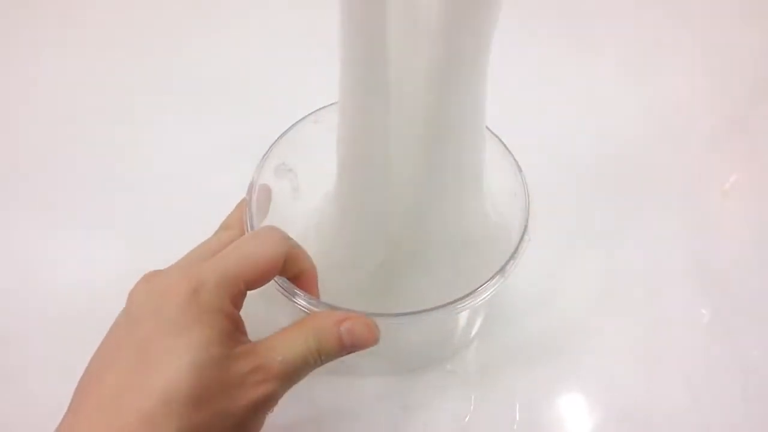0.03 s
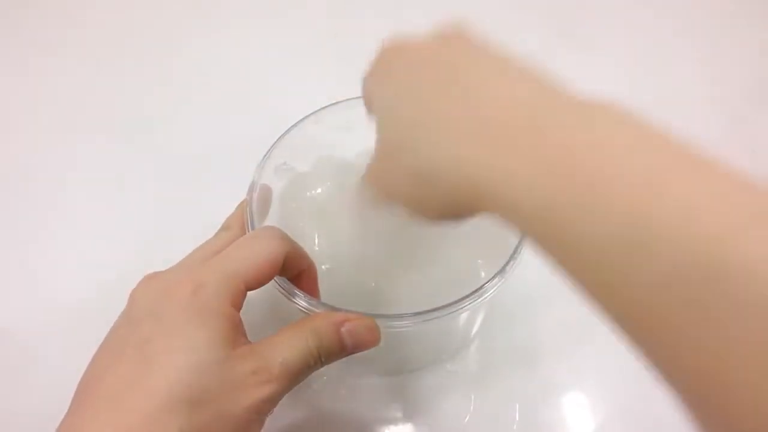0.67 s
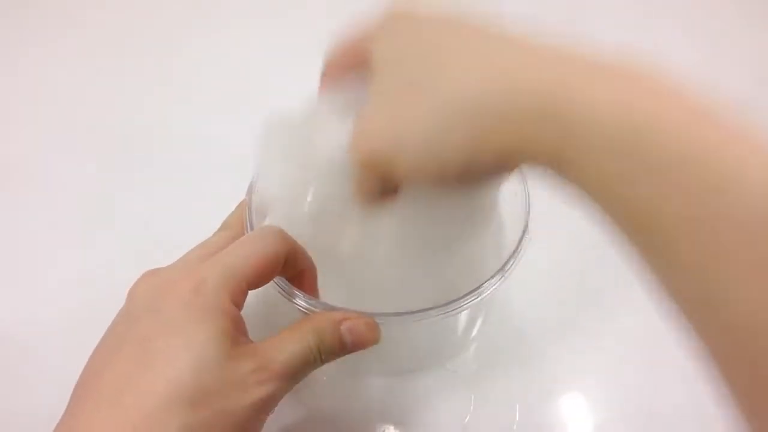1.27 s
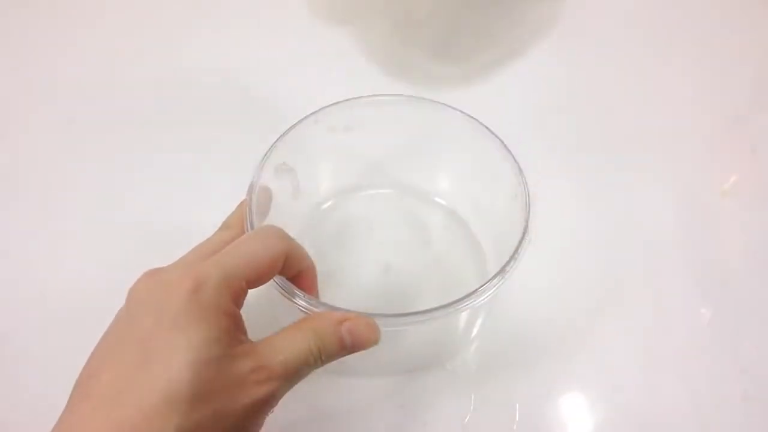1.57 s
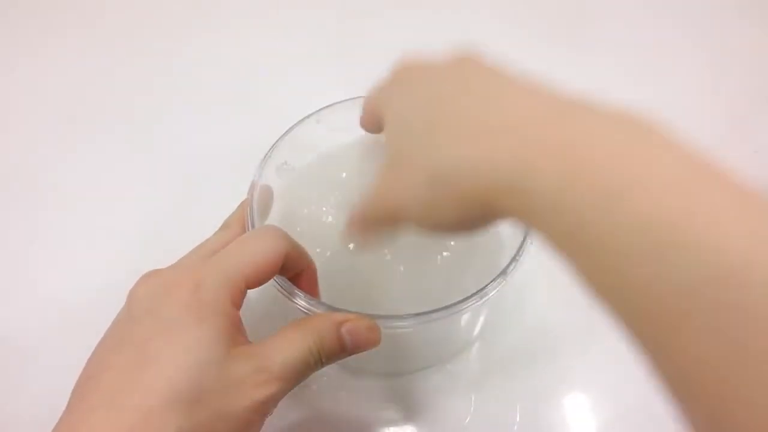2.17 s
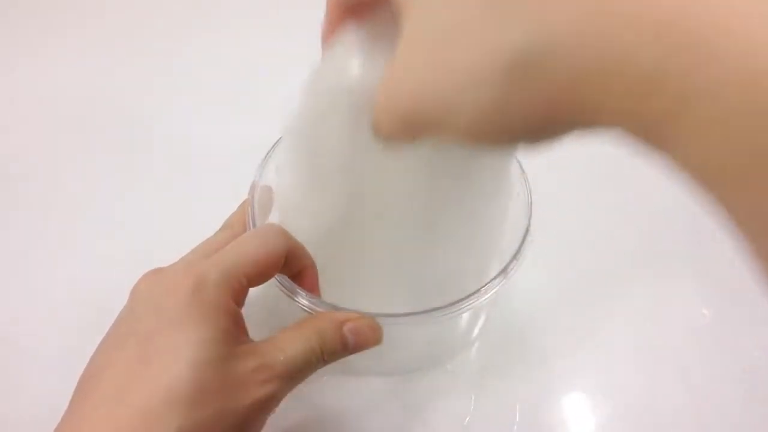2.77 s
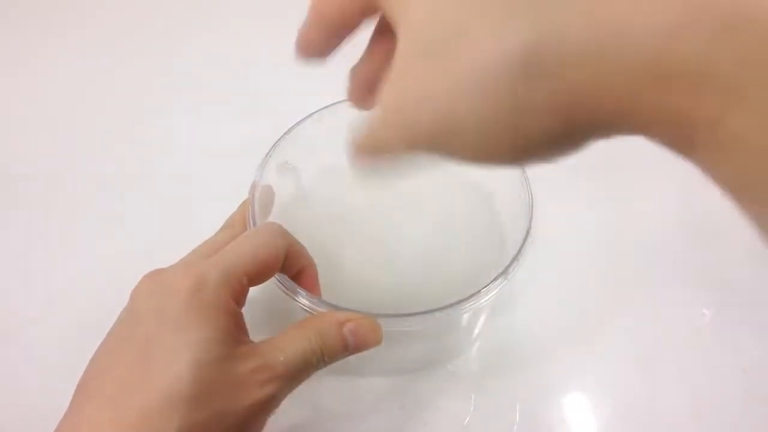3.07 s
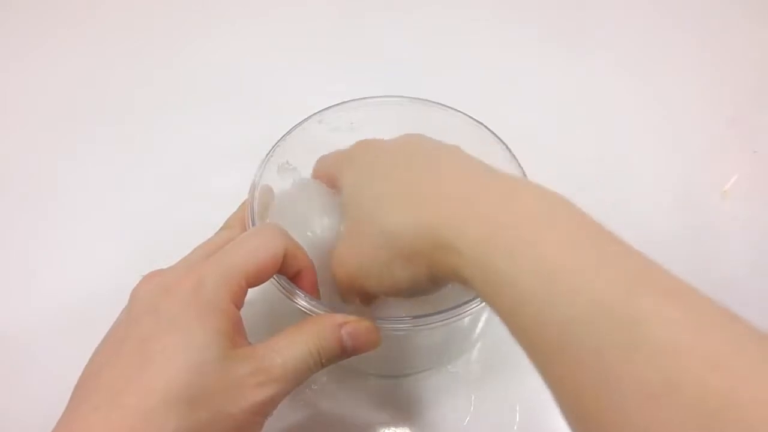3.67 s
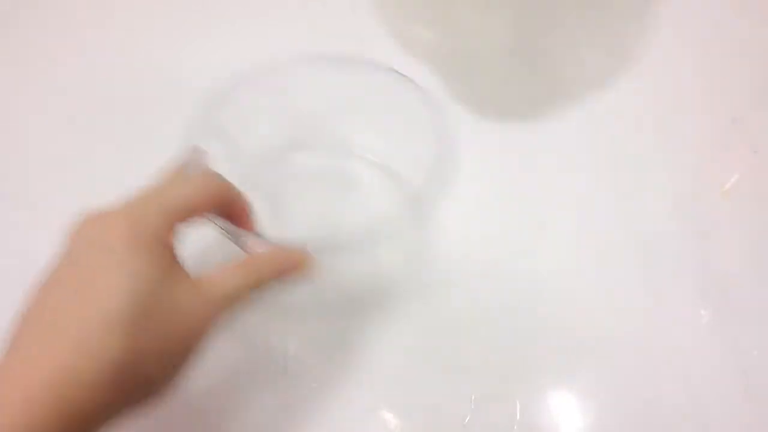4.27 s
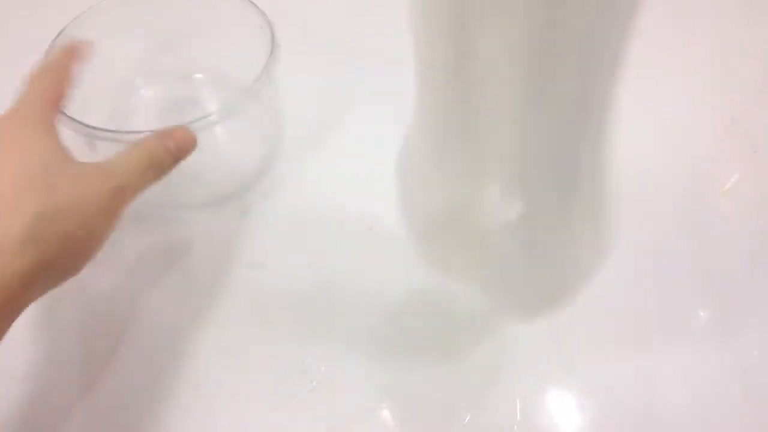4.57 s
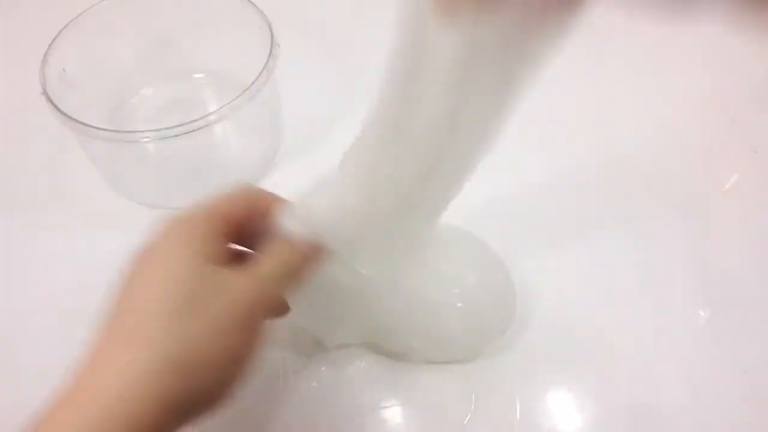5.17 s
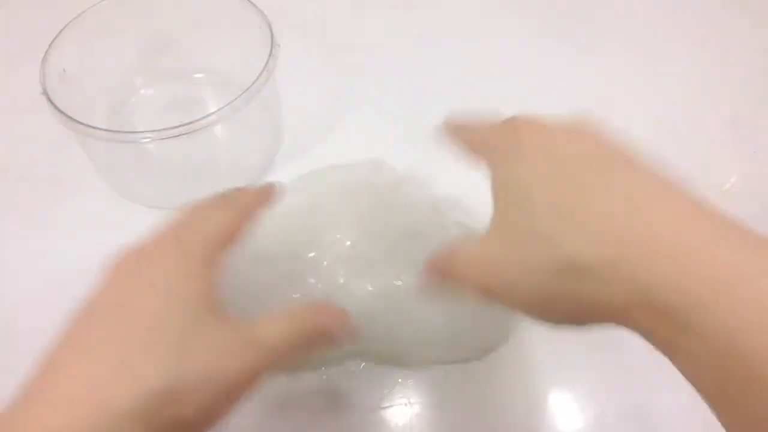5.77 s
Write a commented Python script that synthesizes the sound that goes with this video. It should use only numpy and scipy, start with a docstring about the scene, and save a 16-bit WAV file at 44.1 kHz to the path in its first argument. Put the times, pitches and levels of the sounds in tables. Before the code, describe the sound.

A hand kneads sticky slime in a plastic cup, close to the microphone. Air pockets pop and snap, fine threads crackle and folds squelch, while pushes knock the cup and thump the table softly. Near the end the empty cup scrapes across the tabletop, followed by quieter rubbing and a few small pops. A small room hums behind it, with a faint, fast chirp like a turning fan.

```python
"""Kneading slime in a plastic cup

A hand kneads sticky slime in a cup on a table, lifts it out, slides the cup away and presses the slime
on the tabletop. Trapped air pops, cracks and squelches, fine threads crackle as they tear, and the
stretching slime gives a thin squeak. The cup knocks and scrapes, and each push thumps the table.
Behind it a small room hums, with a faint, evenly repeating chirp like that of a turning fan."""
import sys
import numpy as np
from scipy import signal
from scipy.fft import rfft, irfft
from scipy.io import wavfile
from scipy.ndimage import uniform_filter1d

SR = 44100
rng = np.random.default_rng(int(sys.argv[2]) if len(sys.argv) > 2 else 0)


def generate_wav(signal):
    """Clip the signal to [-1, 1] and save it as 16-bit WAV at the path in sys.argv[1]."""
    frames = np.transpose(np.atleast_2d(signal))
    scaled = np.clip(frames, -1, 1) * 32767
    pcm = np.round(scaled).astype(np.int16)
    wavfile.write(sys.argv[1], SR, pcm)


N = 261513
TIME = np.arange(N) / SR

# Levels in the tables are relative; each layer sets its own trim.
# room tone: freq_hz, level_db
HISS_SPECTRUM = [(15, -46.5), (25, -11.5), (117, -8), (270, -8.5), (317, -11), (463, -6), (516, -13),
                 (624, -9.5), (714, -9), (887, -13.5), (2610, -27.5), (4140, -29), (8140, -33),
                 (11600, -33.5), (16000, -42)]
# the chirp fades and returns: time_s, level_db
CHIRP_FADER = [(1.85, -48), (2.05, -63), (2.6, -56), (2.9, -52.5), (3.25, -56.5), (4.0, -47)]
# the hand squeezes or stretches the slime: peak_s, rise_s, fall_s, threads_db, bubbles_db, drag_db
KNEADS = [(0.262, .1, .08, -56, -52, -65), (0.38, .08, .14, -58, -61, -62), (0.78, .1, .12, -58, -48, -43),
          (0.87, .03, .08, -48, -45, -49), (1.045, .11, .15, -37.5, -44, -42),
          (1.26, .05, .19, -54, -56, -48), (1.79, .14, .12, -54, -54, -63),
          (2.305, .11, .1, -47, -47.5, -47), (2.49, .08, .1, -55, -55, -56),
          (2.615, .11, .21, -50, -48.5, -47), (2.99, .08, .12, -53.5, -52, -64),
          (3.47, .07, .15, -55, -51, -49), (3.65, .08, .22, -44, -47.5, -41.5),
          (3.9, .12, .16, -58.5, -54, -57), (5.27, .06, .2, -58, -63, -61), (5.46, .07, .1, -52, -50, -50),
          (5.58, .06, .11, -59, -56, -64)]
# the slime slaps down or comes unstuck: peak_s, drag_db, spray_db
SLAPS = [(0.678, -28.5, -54), (1.872, -30, -39), (2.228, -45, -51), (3.108, -29.5, -45), (3.39, -44, -57),
         (4.59, -42, -62)]
# bright tearing threads: freq_hz, level_db
THREAD_SPECTRUM = [(1760, -28.5), (3000, -7), (3330, -2.5), (4470, -5.5), (4900, -7), (5290, -6.5),
                   (9330, -5), (14100, -7), (16000, -21)]
# small wet bubbles: freq_hz, level_db
BUBBLE_SPECTRUM = [(200, -7), (600, -7), (1400, 1.5), (2600, 0), (3600, -9.5), (5500, -20)]
# dull friction on the table: freq_hz, level_db
DRAG_SPECTRUM = [(40, -46), (75, -24), (130, -11), (210, -3), (350, 1), (600, -1.5), (850, -8),
                 (1500, -10.5), (3000, -41)]
# air pockets burst: start_s, snap_db, pocket_vs_snap_db, pocket_hz, snap_hz
POPS = [(0.2408, -31.5, -14, 720, 11700), (0.3432, -30, -14, 703, 8700), (0.6943, -24, 0, 1880, 2930),
        (0.799, -21, -34, 1870, 7450), (0.8815, -22, -32, 1200, 7770), (1.1093, -18, -20, 969, 2740),
        (1.1568, -25.5, -22, 710, 6700), (1.1957, -25, -18, 700, 10600), (1.259, -25, -12, 703, 10500),
        (1.8405, -23.5, -9, 786, 3550), (1.861, -10, -16, 2150, 2400), (1.8643, -14.5, -2.5, 905, 2460),
        (1.8797, -15, -13, 715, 5500), (1.9697, -31, -19, 1120, 11200), (2.3411, -27.5, -16, 1040, 2700),
        (2.4023, -31, -7, 1400, 9800), (2.4912, -33.5, -3, 990, 2590), (3.0563, -28, -2.5, 700, 2410),
        (3.0925, -24, -21, 1080, 2400), (3.0998, -14, -10.5, 950, 4200), (3.1066, -8, -12, 1060, 5500),
        (3.4478, -20.5, -12, 1860, 11400), (3.4784, -30.5, -3, 996, 2670), (3.5765, -29, -9, 1170, 2580),
        (3.6296, -22, -13, 1220, 3360), (3.8125, -27, -12.5, 816, 7710), (3.8931, -34, 3, 2520, 2850),
        (4.09, -33.5, -31, 783, 12000), (4.6991, -23, -10, 1310, 10100), (5.4321, -25, -24, 744, 7340),
        (5.5394, -26.5, -20, 754, 8000)]
# a slime film breaking: freq_hz, level_db
SNAP_SPECTRUM = [(400, -21), (1100, 2.5), (1800, 0.5), (2700, -4.5), (4000, -5), (5400, -6.5), (6500, -6),
                 (8000, -2.5), (10500, -1.5), (14500, -6), (17000, -20.5)]
# the hand knocks the cup, each spot favouring one band: start_s, level_db, centre_hz
KNOCKS = [(0.6662, -22.5, 2610), (0.6767, -19, 2780), (0.7279, -22, 2730), (2.2209, -25, 2280),
          (2.3164, -28, 1830), (3.3728, -26, 2970), (3.3899, -25.5, 2970), (4.3395, -18.5, 1830),
          (4.5806, -22.5, 1650)]
# the cup damped by slime and fingers: pitch_hz, width_hz, level_db
FULL_CUP_MODES = [(1100, 120, 7.5), (1410, 39, 6), (1860, 310, -2), (2820, 180, 0), (3700, 73, -7),
                  (4050, 85, -16), (5740, 370, -23.5), (6300, 150, -18)]
# cup or slime is pushed onto the table: start_s, level_db, rise_s
THUMPS = [(0.667, -23.5, 0.0016), (0.728, -25, .003), (0.763, -26, 0.021), (0.85, -27, 0.0015),
          (0.923, -30, 0.019), (1.036, -26, 0.0074), (1.112, -32, 0.0026), (1.867, -15.5, 0.0013),
          (2.221, -26.5, .002), (2.26, -26, 0.018), (2.569, -38, 0.011), (3.059, -32.5, 0.0033),
          (3.106, -22.5, 0.0032), (3.376, -29.5, 0.0016), (3.39, -20.5, 0.0068), (3.583, -22, 0.018),
          (3.702, -25.5, 0.028), (4.275, -31, 0.013), (4.374, -19, 0.0023), (4.453, -29.5, 0.0024),
          (4.583, -20, 0.0027), (4.699, -38.5, 0.0044)]
# the ring of the tabletop, strongest mode first: pitch_hz, level_db, t60_s
TABLE_MODES = [(127, -3.3, .145), (95, -14.5, 0.14), (186.5, -9, .13), (262, -13, 0.1), (310, -9, .08),
               (417, -18.5, 0.096), (590, -11, 0.08)]
# the ring of one large bursting bubble: pitch_hz, width_hz, level_db
CRACK_MODES = [(1220, 250, 4), (1750, 400, 0), (2700, 500, -6), (4150, 600, 0), (5350, 400, 2),
               (7700, 700, 0), (8600, 700, -7)]
# air squeezed through a fold: peak_s, rise_s, fall_s, level_db, pitch_hz
SQUELCHES = [(1.05, .1, .09, -30, 1010), (1.895, .02, .06, -39, 905), (2.31, .05, .06, -47, 1060),
             (2.48, .08, .09, -46, 1090), (2.615, .05, .1, -45, 950), (3.062, .008, .04, -39, 930),
             (3.109, .012, .028, -24, 1080), (3.15, .02, .06, -47, 1000), (3.64, .025, .13, -40, 1110),
             (3.725, .03, .08, -42, 1020), (3.875, .06, .05, -48, 770)]
# the stretching slime squeaks: time_s, level_db, slips_per_s
SQUEAK_CURVE = [(2.75, -75.5, 1400), (2.82, -68, 1270), (2.96, -68, 1392), (3.1, -72, 2300),
                (3.21, -60, 1400), (3.27, -69, 1500), (3.35, -80, 1240)]
# the empty cup, ringing more freely: pitch_hz, width_hz, level_db
EMPTY_CUP_MODES = [(1000, 300, -1), (1470, 120, -1), (1780, 90, 12), (2080, 50, 8), (2340, 130, 9),
                   (2620, 130, 7), (3370, 460, 0), (4350, 100, -7), (5170, 47, -12), (8300, 200, -19),
                   (9300, 52, -23), (10600, 54, -19), (11000, 85, -25)]
# plastic hissing over the table: freq_hz, level_db
SCRAPE_SPECTRUM = [(1200, -12), (2500, -1.5), (4000, 3.5), (6500, 1), (10000, -0.5), (14000, -3),
                   (17000, -14)]
# the sliding cup catches: peak_s, boost_db
JUDDERS = [(4.228, 4), (4.295, 3), (4.465, 5)]
# cup or hand rubs the tabletop: peak_s, rise_s, fall_s, level_db
RUBS = [(4.39, .03, .07, -47), (4.465, .04, .1, -39), (4.605, .025, .07, -37), (5.06, .07, .2, -50),
        (5.3, .16, .12, -48), (5.46, .06, .08, -51)]
# the room's reverb by band: freq_hz, t60_s, level_db
REVERB_BANDS = [(100, 0.75, -2), (300, 0.21, 3.5), (900, .24, -4.5), (2010, 0.19, -3), (5000, .24, 0),
                (13000, .22, 1.5)]


def amp(db):
    """Decibels to gain."""
    return 10 ** (np.asarray(db) / 20)


def unit(x):
    """Scales to rms 1."""
    return x / np.sqrt(np.mean(x ** 2) + 1e-20)


def curve_at(points, hz):
    """Reads a curve on a log-frequency axis."""
    freqs, values = np.transpose(points)
    return np.interp(np.log(hz + 1), np.log(freqs), values)


def add(mix, start_s, sound):
    """Drops a sound into the mix."""
    part = mix[max(round(start_s * SR), 0):][:len(sound)]
    part += sound[:len(part)]


def colour(x, spectrum, size=4096):
    """Minimum-phase EQ with the given spectrum."""
    log_gain = np.log(amp(curve_at(spectrum, abs(np.fft.fftfreq(size, 1 / SR)))))
    taps = np.fft.ifft(np.exp(signal.hilbert(log_gain).conj())).real
    return signal.fftconvolve(x, taps[:size // 2])[:len(x)]


def resonate(x, hz, width_hz):
    """A resonance of gain 1 whose pitch may move."""
    carrier = np.exp(2j * np.pi * np.cumsum(hz * np.ones(len(x))) / SR)
    pole = np.exp(-np.pi * width_hz / SR)
    return 2 * (carrier * signal.lfilter([1 - pole], [1, -pole], x / carrier + 1e-18)).real


def band(x, hz, width_hz):
    """Two resonances in series for steeper skirts; rms 1."""
    return unit(resonate(resonate(x, hz, width_hz), hz, width_hz))


def wander(seconds):
    """A smooth random drift of rms 1."""
    size = max(round(seconds * SR), 1)
    return unit(uniform_filter1d(uniform_filter1d(rng.standard_normal(N), size), size))


def swell(peak_s, rise_s, fall_s, db=0, roundness=1.3):
    """Envelope of one gesture: climbs 20 dB in rise_s, tops out at db, sinks 20 dB in fall_s."""
    t = TIME[::32]
    away = np.maximum((peak_s - t) / rise_s, (t - peak_s) / fall_s)
    return np.interp(TIME, t, amp(db - 20 * np.minimum(away ** roundness, 10)))


def clicks(per_s, spread_db):
    """A random train of clicks, most small and a few large."""
    size = amp(spread_db * np.minimum(rng.exponential(1, N), 4))
    return size * rng.choice([-1, 1], N) * (rng.random(N) < per_s / SR)


def blip(t, hz, cycles, glide):
    """A bubble rings for a few cycles with rising pitch."""
    age = t * hz / cycles
    return np.sin(2 * np.pi * hz * t * (1 + glide * np.tanh(age))) * np.exp(-age)


def grains(low_hz, high_hz, per_s, spread_db, cycles, glide, sizes=24):
    """A cloud of tiny blips of many sizes."""
    t, out = np.arange(SR // 50) / SR, np.zeros(N)
    for hz in np.geomspace(low_hz, high_hz, sizes):
        out += hz * signal.oaconvolve(clicks(per_s / sizes, spread_db), blip(t, hz, cycles, glide))[:N]
    return unit(out)


def strike(modes, rattle_s):
    """A brief rough blow, even in spectrum, rings a set of modes; peak 1."""
    t = np.arange(SR // 16) / SR
    rough = rfft(rng.choice([-1, 1], len(t)) * t * np.exp(-t / rattle_s))
    blow = irfft(rough / abs(rough), len(t)) * np.exp(-t / (10 * rattle_s))
    ring = sum(amp(db) * resonate(blow, hz, width) for hz, width, db in modes)
    return ring / abs(ring).max()


def kneading(layer, follow=1):
    """One layer's envelope over all kneads; follow below 1 broadens the swells."""
    column = 3 + ["threads", "bubbles", "drag"].index(layer)
    return sum(amp(row[column]) * swell(*row[:3]) ** follow for row in KNEADS)


def slapping(layer, rise_s=.013, fall_s=.075):
    """One layer's envelope over all slaps, a quick swell each."""
    column = 1 + ["drag", "spray"].index(layer)
    return sum(swell(row[0], rise_s, fall_s, row[column]) for row in SLAPS)


def room_tone(chirps_per_s=14.985, chirp_hz=706, sweep_hz=22, chirp_s=.011, lead_s=.0036):
    """The bed: hiss, a soft drone and a short rising chirp that repeats like a turning fan."""
    from_peak_s = (((TIME + lead_s) * chirps_per_s + .5) % 1 - .5) / chirps_per_s
    pitch = chirp_hz + sweep_hz * np.tanh(from_peak_s / chirp_s)
    chirp = np.sin(2 * np.pi * np.cumsum(pitch) / SR) * np.exp(-(from_peak_s / chirp_s) ** 2)
    fader = amp(np.interp(TIME, *np.transpose(CHIRP_FADER)))
    drone = band(rng.standard_normal(N), hz=338, width_hz=60)
    hiss = unit(colour(rng.standard_normal(N), HISS_SPECTRUM))
    return fader * chirp + amp(-63) * drone + amp(-56) * hiss


def crackle(bubbles_db=-1, clump_db=3.5):
    """Sticky threads tear in clumps of fine ticks while small bubbles burst lower down."""
    ticks = grains(2700, 17000, per_s=2600, spread_db=2.3, cycles=3.2, glide=.063)
    blips = grains(550, 4000, per_s=1200, spread_db=2.4, cycles=3.6, glide=.12)
    clumps = unit(amp(clump_db * wander(seconds=.006)))
    spray = slapping("spray")
    threads = unit(colour(ticks, THREAD_SPECTRUM)) * (kneading("threads") + spray)
    bubbles = unit(colour(blips, BUBBLE_SPECTRUM)) * (kneading("bubbles") + spray)
    return clumps * (threads + amp(bubbles_db) * bubbles)


def drag(rub_db=-4, boom_db=-7):
    """The soft mass sticks and slips with a dull rub that keeps the table booming."""
    slips = clicks(per_s=900, spread_db=2)
    boom = band(slips, TABLE_MODES[0][0], width_hz=38)
    force = kneading("drag", follow=.75) + slapping("drag")
    return force * (amp(rub_db) * unit(colour(slips, DRAG_SPECTRUM)) + amp(boom_db) * boom)


def pops(delay_s=.00099, tear_s=.00036, spray=.087, spray_s=.0076, focus_db=4, pocket_trim_db=6):
    """A film tears with a snap and a spray, and the opened air pocket rings briefly."""
    t, out = np.arange(SR // 25) / SR, np.zeros(N)
    opening = 1 - np.exp(-t / tear_s)
    envelope = opening * (np.exp(-t / tear_s) + spray * np.exp(-t / spray_s))
    for start_s, snap_db, pocket_db, pocket_hz, snap_hz in POPS:
        # the film's size favours one band, and the time it takes to tear dulls the top
        spectrum = [(hz, db - focus_db * abs(np.log2(hz / snap_hz)) - 1.24 * hz * tear_s)
                    for hz, db in SNAP_SPECTRUM]
        snap = colour(rng.choice([-1, 1], len(t)) * envelope, spectrum)
        pocket = amp(pocket_db + pocket_trim_db) * opening * blip(t, pocket_hz, cycles=2.5, glide=.021)
        add(out, start_s + delay_s, amp(snap_db) * (snap / abs(snap).max() + pocket))
    return out


def cup_knocks(trim_db=1, delay_s=.00082, focus_db=9, grip_width_hz=70, lowpass_hz=7000):
    """Short rattling contacts of a soft hand ring the damped cup."""
    out = np.zeros(N)
    for start_s, level_db, centre_hz in KNOCKS:
        modes = [(hz, width + grip_width_hz, db - focus_db * abs(np.log2(hz / centre_hz)))
                 for hz, width, db in FULL_CUP_MODES]
        add(out, start_s + delay_s, amp(level_db + trim_db) * strike(modes, rattle_s=.0011))
    pole = np.exp(-2 * np.pi * lowpass_hz / SR)
    return signal.lfilter([1 - pole], [1, -pole], out)


def table_thumps(trim_db=2, dulling_per_s=100, low_cut_hz=75):
    """Pushes ring the table; a slow push hardly reaches the upper modes."""
    t, out = np.arange(SR // 2) / SR, np.zeros(N)
    main_hz, _, main_t60 = TABLE_MODES[0]
    for start_s, level_db, rise_s in THUMPS:
        rolloff = dulling_per_s * rise_s
        ring = sum(amp(db - 60 * t / t60) * np.sin(2 * np.pi * hz * t) / max(hz / main_hz, 1) ** rolloff
                   for hz, db, t60 in TABLE_MODES)
        attack = 1 - np.exp(-(t / rise_s) ** 2)
        makeup_db = 60 * rise_s / main_t60  # offsets the decay during the attack
        add(out, start_s, amp(level_db + makeup_db) * attack * ring)
    # a low cut takes the deepest bass out of the thumps
    low_cut = signal.butter(4, low_cut_hz, "high", fs=SR, output="sos")
    return amp(trim_db) * signal.sosfilt(low_cut, out)


def bubble_crack(start_s=.85, trim_db=-2.6, slapback_s=.0018, slapback_db=-11):
    """One large, taut bubble ruptures at once, and the cup wall throws the crack back."""
    ring = strike(CRACK_MODES, rattle_s=.00028)
    crack = amp(trim_db) * np.tanh(1.2 * ring)  # soft clipping makes it dense and hard
    out = np.zeros(N)
    add(out, start_s, crack)
    add(out, start_s + slapback_s, amp(slapback_db) * crack)
    return out


def squelches(trim_db=-.5, sag_octaves_per_s=1.5):
    """Air escapes in uneven spurts that ring a fold, whose pitch sinks as it empties."""
    spurts, out = clicks(per_s=1100, spread_db=2.4), np.zeros(N)
    for peak_s, rise_s, fall_s, db, hz in SQUELCHES:
        active = (TIME > peak_s - 2 * rise_s) & (TIME < peak_s + 2 * fall_s)
        pitch = hz * 2 ** (-sag_octaves_per_s * (TIME[active] - peak_s))
        fold = band(spurts[active], pitch, width_hz=340)
        out[active] += swell(peak_s, rise_s, fall_s, db)[active] * fold
    return amp(trim_db) * out


def squeak(trim_db=-.5, waver=.006):
    """Stretching slime slips fast and evenly, heard only in three high harmonics."""
    times, levels_db, slips_per_s = np.transpose(SQUEAK_CURVE)
    slip_rate = np.interp(TIME, times, slips_per_s) * (1 + waver * wander(seconds=.0144))
    phase = 2 * np.pi * np.cumsum(slip_rate) / SR
    tone = sum(amp(db) * np.sin(harmonic * phase) for harmonic, db in [(7, -2), (8, 0), (9, -6)])
    fader_db = np.interp(TIME, times, levels_db, left=-200, right=-200)
    return amp(fader_db + trim_db) * unit(tone)


def cup_slide(start_s=4.215, stop_s=4.585, fade_s=.055, judder_s=.022, flex=.011, chatter_db=1.8):
    """Chattering slips hiss, rumble the table and ring the empty cup, detuned as fingers flex it."""
    slips = clicks(per_s=12000, spread_db=2.5) * amp(chatter_db * wander(seconds=.0074))
    ring = sum(amp(db) * resonate(slips, hz * (1 + flex * wander(seconds=.039)), width)
               for hz, width, db in EMPTY_CUP_MODES)
    hiss = amp(-2.5) * unit(colour(slips, SCRAPE_SPECTRUM))
    rumble = amp(-14) * unit(colour(slips, DRAG_SPECTRUM))
    outside_s = np.maximum(start_s - TIME, TIME - stop_s)
    gate = amp(-20 * np.clip(outside_s / fade_s, 0, 10))
    judder = amp(sum(db * swell(peak_s, judder_s, judder_s) for peak_s, db in JUDDERS))
    # the ring leads as the cup sets off; the scrape swells at mid travel
    cup = swell(peak_s=4.26, rise_s=.24, fall_s=.36, db=-36.5) * unit(ring)
    scrape = swell(peak_s=4.35, rise_s=.16, fall_s=.35, db=-36) * (hiss + rumble)
    return gate * judder * (cup + scrape)


def table_rubs(trim_db=-1, rustle_db=-10):
    """Cup and hand rub over the table with a hollow body and a faint, higher rustle."""
    slips = clicks(per_s=1200, spread_db=3.5)
    hollow = band(slips, hz=332, width_hz=130)
    rustle = band(slips, hz=1250, width_hz=900)
    return amp(trim_db) * sum(swell(*row) for row in RUBS) * (hollow + amp(rustle_db) * rustle)


def reverb(send, predelay_s=.003, reflections_per_s=3000):
    """Sparse reflections of a small hard room, each band dying at its own speed."""
    taps = rng.choice([-1, 1], SR // 2) * (rng.random(SR // 2) < reflections_per_s / SR)
    hz, t, bands = signal.stft(taps, SR, nperseg=256)
    t60, db = (curve_at(np.array(REVERB_BANDS)[:, [0, column]], hz)[:, None] for column in (1, 2))
    tail = signal.istft(bands * amp(db - 60 * t / t60), SR)[1]
    response = np.concatenate([np.zeros(round(predelay_s * SR)), tail / np.linalg.norm(tail)])
    return signal.fftconvolve(send, response)[:N]


def scene():
    """The mono mix: slime, cup and table up close, each bus with a reverb send, over the room tone."""
    snaps = pops() + cup_knocks()
    crack = bubble_crack()
    thumps = table_thumps()
    textures = crackle() + squelches() + drag() + cup_slide() + table_rubs() + squeak()
    send = amp(-4) * snaps + amp(-5.5) * crack + amp(-6) * textures + amp(-13) * thumps
    return (snaps + crack + thumps + textures + reverb(send) + room_tone())[None]


def record(dry):
    """A steep high cut at 16.2 kHz takes off the very top."""
    high_cut = signal.firwin(511, 16200, window=("kaiser", 9), fs=SR)
    return signal.oaconvolve(dry, high_cut[None], "same")


dry = scene()
out = record(dry)
generate_wav(out)
```